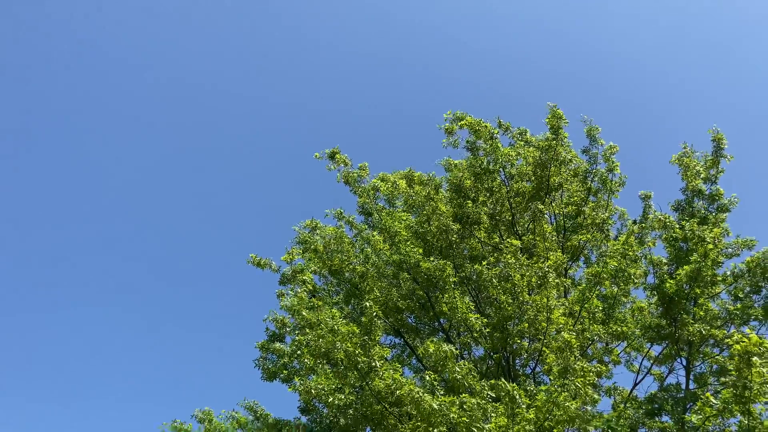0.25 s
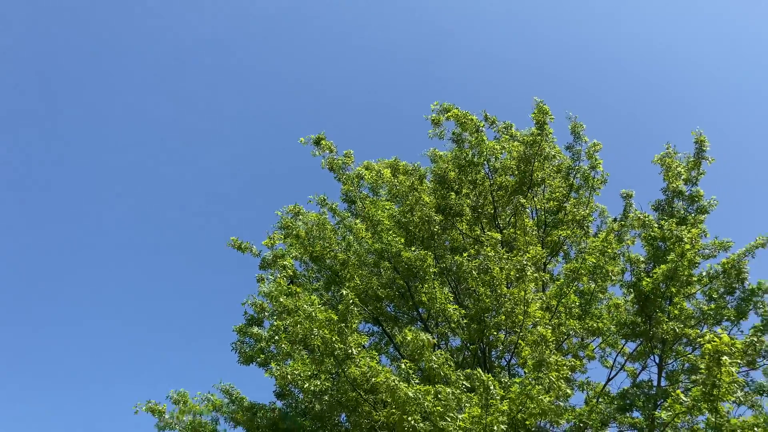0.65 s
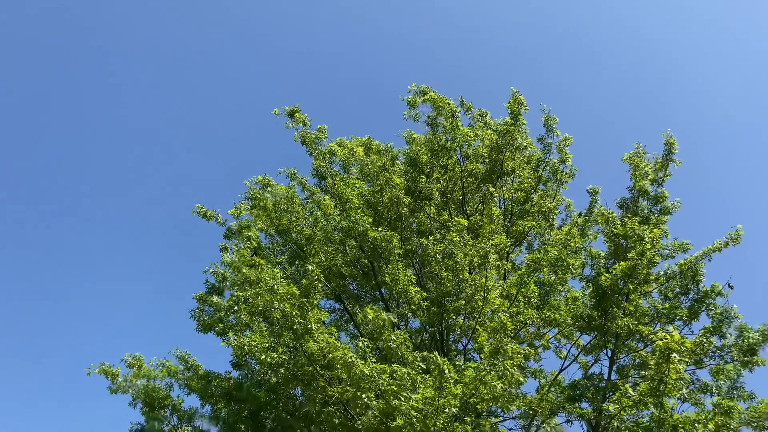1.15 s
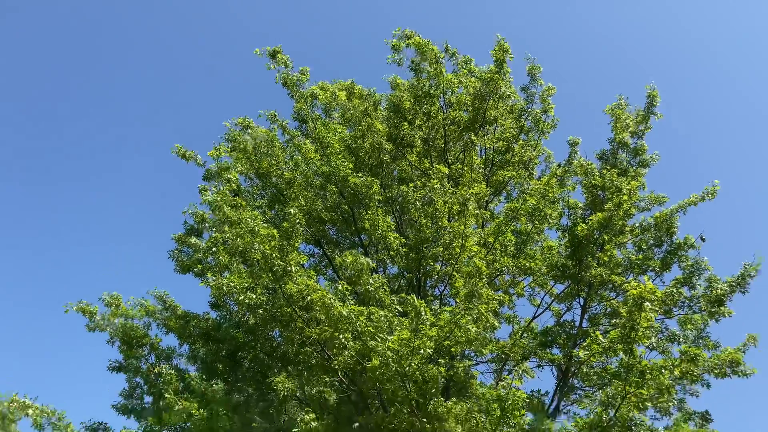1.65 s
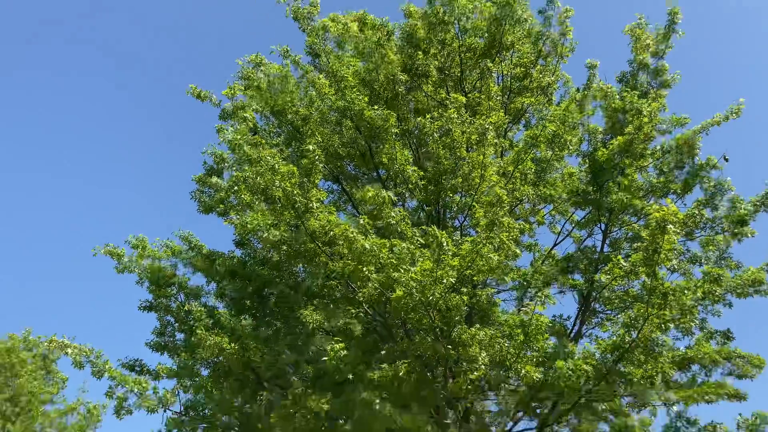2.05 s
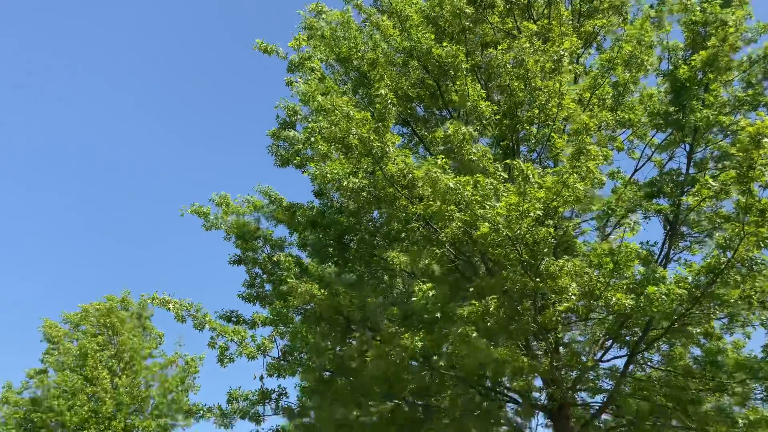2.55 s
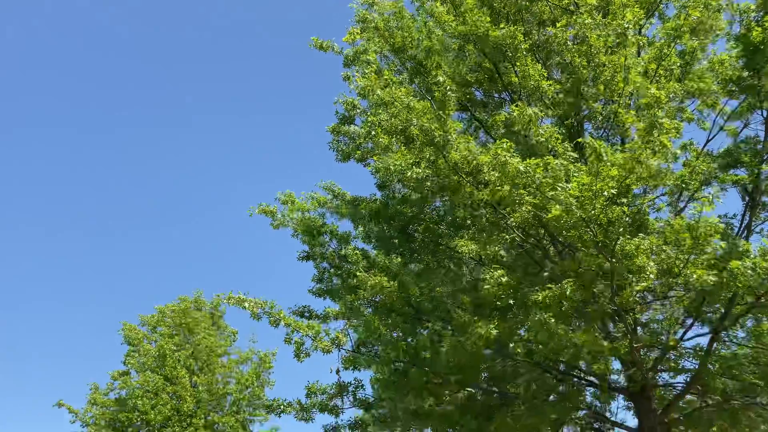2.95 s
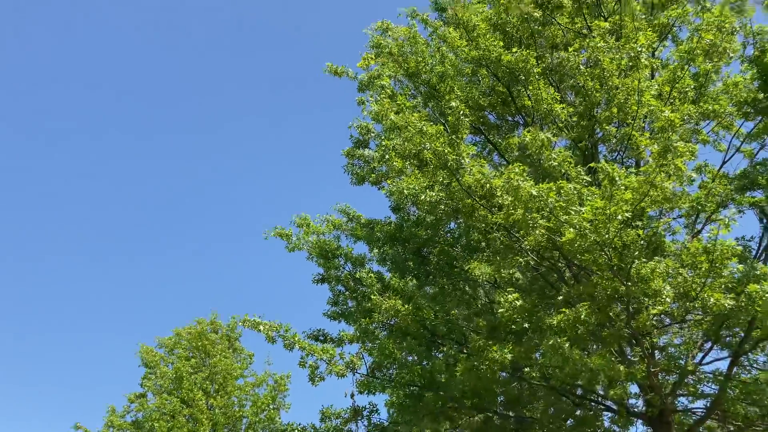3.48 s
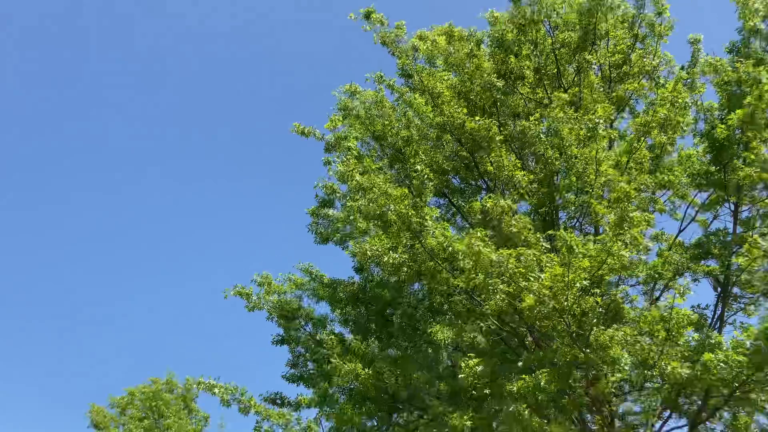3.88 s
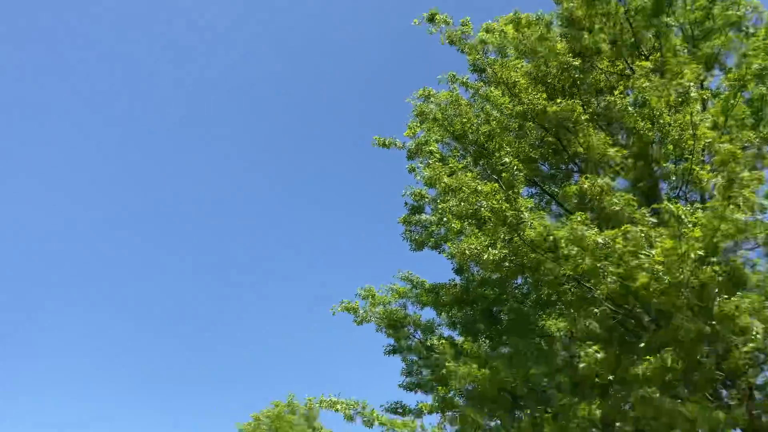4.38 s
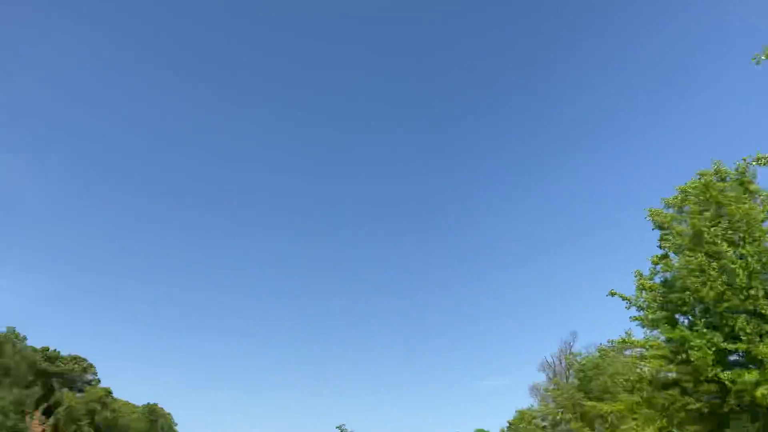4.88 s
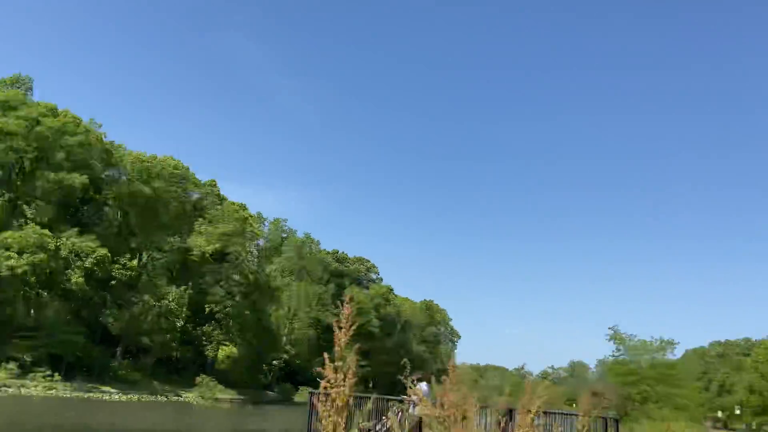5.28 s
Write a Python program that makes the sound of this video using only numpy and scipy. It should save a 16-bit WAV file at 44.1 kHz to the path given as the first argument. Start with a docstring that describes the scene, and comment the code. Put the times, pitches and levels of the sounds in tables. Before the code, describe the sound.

A blackbird whistles two thin falling alarms over scattered harsh chacks, faint distant birdsong and a low wind and traffic rumble outdoors.

```python
"""Blackbird alarm by a pond

A blackbird whistles two falling alarms, a gliding near-sine with throat-filtered overtones; neighbours
give harsh chacks, noise through resonances. Faint gliding tones make far birds; noise tails, leaves and woods.
Shaped noise makes traffic and leaf sound, slow noise and damped sines the wind on a hand-held phone."""
import sys
import numpy as np
from scipy import signal
from scipy.fft import rfft, irfft, next_fast_len
from scipy.io import wavfile
from scipy.ndimage import uniform_filter1d

SR = 44100
rng = np.random.default_rng(int(sys.argv[2]) if len(sys.argv) > 2 else 0)


def master_out(mix):
    """Clip the mix to full scale and print it as 16-bit PCM to the path in sys.argv[1]."""
    frames = np.transpose(np.atleast_2d(mix))
    ceiling = np.clip(frames, -1, 1)
    pcm = np.round(ceiling * 32767).astype(np.int16)
    wavfile.write(sys.argv[1], SR, pcm)


N = 243873
T = np.arange(N) / SR  # time [s]
F = np.fft.rfftfreq(N, 1 / SR)  # frequency [Hz]
EARS = np.array([[.5], [-.5]])  # left and right shares of a difference between the microphones


def undb(db):
    """Decibels are logarithmic: 20 dB is a tenfold amplitude."""
    return 10 ** (np.asarray(db) / 20)


def unit(x):
    """Normalisation to a root-mean-square of 1."""
    return x / np.sqrt(np.mean(x ** 2))


def band(x, hz, width):
    """Two-pole resonance: gain 1 at the centre, falling away over the bandwidth."""
    return signal.lfilter(*signal.iirpeak(hz, hz / width, SR), x)


def walk(rate, count=N):
    """Random modulation: independent levels, rate a second, joined by smooth steps."""
    place = np.arange(count) * rate / SR
    k = place.astype(int)
    levels = rng.standard_normal(k[-1] + 2)
    step = np.sin(np.pi / 2 * (place - k)) ** 2
    return levels[k] * (1 - step) + levels[k + 1] * step


def add(out, s, x, pan_db, lag_ms=0.):
    """Stereo placement by level difference (left minus right) and time difference (left lag)."""
    for ear in range(2):
        i = int((s + EARS[ear, 0] * lag_ms / 1000) * SR)
        part = x[:N - i]
        out[ear, i:i + len(part)] += part * undb(EARS[ear, 0] * pan_db)


def glide(length, from_hz, to_hz, db):
    """Frequency modulation: one short pure tone whose phase integrates a linear glide."""
    u = np.linspace(0, 1, int(length * SR))
    hz = from_hz + (to_hz - from_hz) * u
    envelope = np.abs(np.sin(np.pi * u)) ** 0.76
    return undb(db) * np.sqrt(2) * envelope * np.sin(2 * np.pi * np.cumsum(hz) / SR)


def air():
    """Band-shaped noise of traffic and leaves: bands swell together, flicker alone; the bass is alike in both ears."""
    # spectrum of traffic and leaves: f/Hz, relative density/dB
    spectrum = [(15, -41), (25, -17.5), (66, -3.5), (115, -2.5), (191, -18.5), (515, -24), (1030, -21),
                (1350, -25.5), (1460, -25.5), (2630, -37.5), (3830, -39), (7890, -61.5), (8780, -60),
                (10900, -55.5), (15000, -90.5)]
    # stereo image: f/Hz, left-right correlation (held within 0.95 either way), left minus right/dB
    image = [(60, 0.8, -4.5), (153, 1, -1), (282, 0.14, 1.5), (556, -0.043, 0.2), (1392, -0.19, 2),
             (3090, 0.1, 3)]
    level_db = -48

    def at(table, column):
        table = np.array(table)
        return np.interp(np.log(F + 1), np.log(table[:, 0]), table[:, column])

    swell = walk(.6)
    noise = rfft(rng.standard_normal((2, N))) * undb(at(spectrum, column=1))
    alike = np.clip(at(image, column=1), -.95, .95)
    spectra = np.sqrt(1 + alike) * noise[0] + np.sqrt(1 - alike) * noise[1] * 2 * EARS
    spectra = spectra * undb(EARS * at(image, column=2))
    out = 0
    for octave in np.arange(4, 14.5, .5):  # log2 of the band centre in Hz
        share = np.cos(np.pi * np.clip(np.log2(F + 1) - octave, -.5, .5)) ** 2
        out = out + undb(swell + walk(7.8)) * irfft(spectra * share, N)
    return undb(level_db) * unit(out)


def wind():
    """Turbulent pressure: eddies shake the microphones in a low flutter with a few hard buffets."""
    # gusts: full from t/s, full until t/s, level over the steady wind/dB
    gusts = [(0, 0.751, 3), (3.44, 3.655, 7), (4.55, 4.97, 2.5), (5.284, 5.355, 4)]
    # buffets: t/s, level/dB, f/Hz
    buffets = [(3.484, -27.5, 71.3), (3.545, -26, 86.6), (3.613, -20.5, 121.5), (3.65, -29, 97),
               (4.801, -33, 140), (4.959, -37.5, 149.1), (5.325, -23, 78), (5.345, -26.5, 148)]
    level_db, climb_db_per_s = -47.5, 0.63
    gust_rise_s, gust_fall_s = 0.2, 0.04

    def rumble(x):
        low = unit(band(band(x, 53, 61), 70, 79))
        return low + undb(-27.5) * unit(band(band(x, 190, 220), 190, 220))

    eddies = rng.standard_normal((2, N)) * undb(3.54 * walk(25))
    mid, side = rumble(eddies[0]), rumble(eddies[1])
    gust_db = 0
    for s, end, db in gusts:
        ramp = np.minimum(1 + (T - s) / gust_rise_s, 1 + (end - T) / gust_fall_s)
        gust_db = gust_db + db * np.clip(ramp, 0, 1)
    out = undb(level_db + climb_db_per_s * T + gust_db) * (mid + .75 * EARS * side)
    for s, db, hz in buffets:
        t = T[:4000]  # each shakes the membrane for about two cycles
        envelope = np.e * hz * t / 0.35 * np.exp(-hz * t / 0.48)
        add(out, s, undb(db) * np.sin(2 * np.pi * hz * t) * envelope, -1.2)
    return out


def chorus():
    """Superposition: many short distant chirps, too far to tell apart."""
    # strength before the leaves scatter it: t/s, lower voices level/dB, higher voices level/dB
    strength = [(0, -64, -79), (0.299, -61, -69.5), (.65, -78, -76.5), (.9, -66.5, -86), (1.3, -62.5, -80),
                (1.549, -67.5, -72.5), (1.9, -63.5, -77.5), (2.998, -60, -78), (3.299, -72, -80),
                (3.9, -63, -72), (4.1, -71, -93), (4.5, -67.5, -87), (5.53, -66.5, -80.5)]
    s, low_db, high_db = np.transpose(strength)
    out = np.zeros((2, N))
    for db, lo_hz, hi_hz in ((low_db, 2400, 4700), (high_db, 4800, 7300)):
        for at, pitch, bend, size in rng.random((1800, 4)):
            hz, start = lo_hz + (hi_hz - lo_hz) * pitch, at * T[-1]
            chirp_db = np.interp(start, s, db) + 5 * size
            add(out, start, glide(.015, hz, hz * (.85 + .3 * bend), chirp_db), 0.)
    return out


def trees(x):
    """Scattering as convolution: leaves answer at once, woods longer and duller, far tree lines echo."""
    # near crown, then woods: level/dB, decay by 60 dB t/s
    leaf_db, leaf_t60 = (-6, 0.21)
    wood_db, wood_t60 = (-23, 1.7)
    # tree lines over the water: delay t/s, smear to either side t/s, level/dB
    echoes = [(0.31, 0.022, -35.5), (0.52, 0.03, -37)]
    t = T[:SR]
    noise = rng.standard_normal((3, 2, SR)) / np.sqrt(SR)
    leaves = undb(leaf_db) * unit(undb(-60 * t / leaf_t60)) * noise[0] * np.clip(t / 0.0084, 0, 1)
    clumps = undb(3.3 * walk(14, count=SR))  # clumps of trees
    far = undb(wood_db) * unit(undb(-60 * t / wood_t60)) * noise[1] * clumps
    for delay, smear, db in echoes:
        far = far + undb(db) * noise[2] * unit(np.clip(1 - np.abs(t - delay) / smear, 0, 1))
    far = signal.lfilter(*signal.butter(2, 5000, fs=SR), far)  # air and foliage take the treble
    size = next_fast_len(N + SR)
    return irfft(rfft(x.mean(axis=0), size) * rfft(leaves + far, size), size)[:, :N]


def buzzes(out):
    """Amplitude modulation: fast uneven beats spread each gliding line into a buzz."""
    # buzzy far phrases: t/s, length t/s, from f/Hz, to f/Hz, level/dB
    phrases = [(0.08, 0.078, 3860, 5800, -62.5), (0.16, 0.082, 3710, 2800, -55),
               (0.81, 0.08, 5700, 4540, -58), (0.865, 0.098, 4200, 2930, -55),
               (1.5, 0.081, 5230, 6340, -60.5), (3.23, 0.096, 3570, 5760, -59.5),
               (3.3, 0.052, 4550, 3470, -56.5), (3.85, 0.15, 3665, 4195, -61)]
    for s, length, from_hz, to_hz, db in phrases:
        note = glide(length, from_hz, to_hz, db)
        add(out, s, note * walk(900, count=SR // 4)[:len(note)], 1.5, .08)


def rising_singer(out):
    """Overlapping glides: a rising double note repeats, each phrase swelling and fading about its peak."""
    # phrases: start t/s, loudest at t/s, end t/s, level/dB
    phrases = [(0.09, 0.09, 0.2, -59.5), (2.01, 2.85, 3.65, -59.5)]
    # parts of the note: start t/s, length t/s, from f/Hz, to f/Hz, relative level/dB
    parts = [(0, 0.025, 1950, 2430, 0), (0.02, 0.033, 2420, 2466, -1.5), (0.022, 0.028, 2000, 2480, -0.5),
             (0.056, 0.039, 2620, 3270, -2)]
    period_s, swell_db_per_s, fade_db_per_s = 0.195, 11, 7
    for begin, peak, end, peak_db in phrases:
        for s in np.arange(begin, end, period_s):
            db = peak_db - max(swell_db_per_s * (peak - s), fade_db_per_s * (s - peak))
            for start, length, from_hz, to_hz, part_db in parts:
                note = glide(length, from_hz, to_hz, db + part_db)
                ripple = 1 + .5 * walk(230, count=SR // 8)[:len(note)]
                add(out, s + start, note * ripple, 2.5, .05)


def single_notes(out):
    """Pure gliding tones from far birds, each placed by its level difference."""
    # far notes: t/s, length t/s, from f/Hz, to f/Hz, level/dB, left minus right/dB
    notes = [(0.14, 0.039, 4100, 4250, -62, -8), (0.51, 0.043, 3523, 3464, -54.5, -2),
             (0.58, 0.025, 3480, 3470, -62, 2), (1.745, 0.023, 4340, 5080, -58.5, 5.5),
             (1.79, 0.031, 3760, 4000, -60, 0), (2.72, 0.053, 4560, 4440, -57, -3),
             (3.41, 0.095, 1997, 1758, -64, 11), (3.44, 0.043, 3330, 3500, -59, 9),
             (3.49, 0.14, 3420, 3370, -70, 5.5), (3.585, 0.052, 5700, 5500, -68.5, 8.5),
             (4.129, 0.031, 2740, 3720, -71, 2), (4.37, 0.039, 3770, 3960, -62.5, 2),
             (4.47, 0.022, 3900, 4430, -56.5, -1), (4.54, 0.019, 3470, 4350, -55.5, 3),
             (4.55, 0.028, 2880, 3690, -64, 1.5), (4.736, 0.025, 2980, 3520, -69, -7),
             (4.79, 0.055, 3520, 2210, -62.5, -1.5)]
    for s, length, from_hz, to_hz, db, pan_db in notes:
        add(out, s, glide(length, from_hz, to_hz, db), pan_db, .08)


def trill(out):
    """Periodic repetition: nine very short falling tones make a dry trill."""
    # each note: from f/Hz, to f/Hz
    from_hz, to_hz = (7100, 5700)
    start_s, period_s, level_db = 3.262, 0.0385, -70
    for k in range(9):
        add(out, start_s + k * period_s, glide(0.0052, from_hz, to_hz, level_db), 1.5)


def twitter(out):
    """Random superposition: faint short glides at random moments, pitches and sides."""
    start_s, end_s = 3.9, 4.85
    least_db, low_hz, high_hz = -75, 2600, 4200
    for at, pitch, bend, size, side in rng.random((22, 5)):
        hz = low_hz + (high_hz - low_hz) * pitch
        note = glide(.03, hz, hz * (.8 + .5 * bend), least_db + 6 * size)
        add(out, start_s + at * (end_s - start_s), note, 12 * (side - .5), .08)


def far_birds():
    """Linear superposition of the five kinds of far voice."""
    out = np.zeros((2, N))
    for voice in (buzzes, rising_singer, single_notes, trill, twitter):
        voice(out)
    return out


def chacks():
    """Source and filter: ragged breath and snaps of the syrinx ring a wide-open throat."""
    # chacks: t/s, length t/s, level/dB, throat f/Hz, width f/Hz, other modes/dB, left minus right/dB, left lag t/ms
    calls = [(0.551, 0.031, -36, 2625, 876, -20.5, 2.5, -0.099),
             (1.182, 0.047, -45, 3600, 1980, 1.5, -3, -0.21), (2.075, 0.058, -48, 3720, 2115, -4, 0, -0.28),
             (2.601, 0.057, -45.5, 3600, 2585, 1.5, 5, 0.057),
             (3.779, 0.047, -43.5, 3640, 1830, -14, -5.5, -0.27),
             (4.932, 0.056, -44.5, 3044, 2290, -13.5, 12.5, -0.51),
             (5.262, 0.055, -40, 3300, 2410, 3, 13.5, -0.36)]
    # other throat modes: f/Hz, width f/Hz, relative level/dB
    upper_modes = [(1500, 770, -14), (8095, 400, -21), (10600, 700, -23.5), (12100, 1500, -23)]
    out = np.zeros((2, N))
    for s, length, db, hz, width, upper_db, pan_db, lag_ms in calls:
        noise = rng.standard_normal(4000)
        hiss = 0.29 * undb(2.4 * walk(450, count=4000))
        snaps = 1.4 * (rng.random(4000) < .04)  # scattered single samples
        breath = noise * (hiss + snaps)
        voice = unit(band(band(band(breath, hz, width), hz, width), hz, width))
        for f, w, mode_db in upper_modes:
            voice = voice + undb(mode_db + upper_db) * unit(band(band(breath, f, w), f, w))
        shape = np.sin(np.pi * np.clip(T[:4000] / length, 0, 1) ** .8) ** 1.6
        add(out, s, undb(db) * voice * shape, pan_db, lag_ms)
    return out


def whistle(s, stretch, pan_db, lead, effort):
    """Source and filter: a near sine from the syrinx; overtones come and go as they cross throat resonances."""
    # pitch, a quick drop, a sagging shelf, a slower drop, a held end: t/s before stretching, f/Hz
    pitch = [(0, 6620), (0.024, 5960), (0.038, 5250), (0.05, 4710), (0.075, 4580), (0.11, 4426),
             (0.2, 4190), (0.27, 3753), (0.31, 3554), (0.39, 3474)]
    # throat response where an overtone lies: f/Hz, level against the fundamental before the source level/dB
    throat = [(7000, -39), (7400, -24.5), (8000, -15.5), (8700, -29.5), (9200, -38.5), (10400, -18),
              (11500, -17), (12600, -28), (13200, -29), (13700, -46), (14600, -25), (16000, -30.5)]
    # source level of the second, third and fourth partial: level/dB
    overtones_db = (0, 1.5, -1.5)
    start, t = int(s * SR), T[:SR // 2]
    hz = uniform_filter1d(np.interp(t / stretch, *np.transpose(pitch)), size=650)
    db = uniform_filter1d(np.interp(t, *np.transpose(effort)), size=500)
    on = np.clip(np.minimum(t / .006, (effort[-1][0] - t) / 0.011), 0, 1)
    jitter = 1 + 0.0013 * walk(60, count=len(t))
    phase = 2 * np.pi * np.cumsum(hz * jitter) / SR
    shimmer_db = 2 * walk(70, count=len(t))
    tone = undb(db + shimmer_db + EARS * pan_db) * np.sin(phase + EARS * lead)
    for k, part_db in enumerate(overtones_db, start=2):
        throat_db = np.interp(k * hz, *np.transpose(throat))
        audible = k * hz < .45 * SR  # stay clear of aliasing
        tone = tone + undb(db + throat_db + part_db) * np.sin(k * phase) * audible
    out = np.zeros((2, N))
    out[:, start:start + len(t)] = np.sqrt(2) * on * tone
    return out


def scene():
    """Superposition of direct sound, scattered sound and background."""
    # alarm whistles: t/s, stretch of the pitch shape, left minus right/dB, left phase lead/rad
    whistles = [(2.08, 0.98, 1.5, 2.16), (4.876, 1.02, -1.1, 0.85)]
    # effort, one list for each whistle: t/s after its start, level/dB
    efforts = [
        [(0, -78), (0.024, -29.5), (0.07, -37.5), (0.125, -37.5), (0.172, -25), (0.2, -26), (0.27, -22.5),
         (0.295, -18.5), (0.35, -29.5), (0.39, -43.5)],
        [(0, -65), (0.024, -29), (0.05, -33.5), (0.11, -45), (0.16, -31.5), (0.18, -28), (0.205, -25.5),
         (0.32, -26), (0.335, -33.5), (0.39, -44)],
    ]
    alarm = sum(whistle(*call, effort) for call, effort in zip(whistles, efforts))
    near, far = alarm + chacks(), far_birds()
    # far birds have a larger scattered share; the chorus arrives only through the trees
    scattered = trees(near + undb(5.5) * far + undb(-4.5) * chorus())
    return near + far + scattered + air() + wind()


def record(dry):
    """Phase and band limits: one treble point spread by a fixed lag and phase turn; deep bass and top cut."""
    treble_hz, lag_s, turn_rad, top_hz = 5800, 0.000231, 2.45, 15900
    spectra = rfft(dry)
    treble = np.clip((F - treble_hz) / 400 + .5, 0, 1)
    spread = np.exp(-1j * EARS * (2 * np.pi * F * lag_s + turn_rad))
    both = irfft((1 - treble) * spectra + treble * spectra.mean(axis=0) * spread, N)
    both = signal.sosfilt(signal.butter(3, 38, "high", fs=SR, output="sos"), both)
    return signal.sosfilt(signal.ellip(10, .2, 80, top_hz, fs=SR, output="sos"), both)


dry = scene()
out = record(dry)
master_out(out)
```